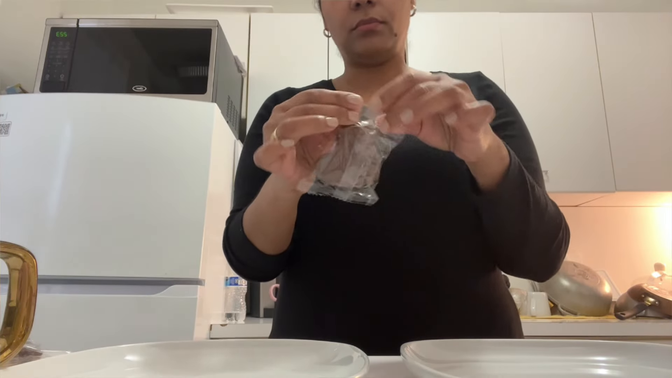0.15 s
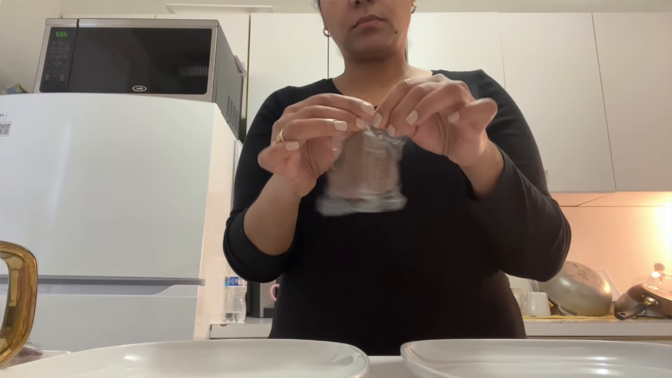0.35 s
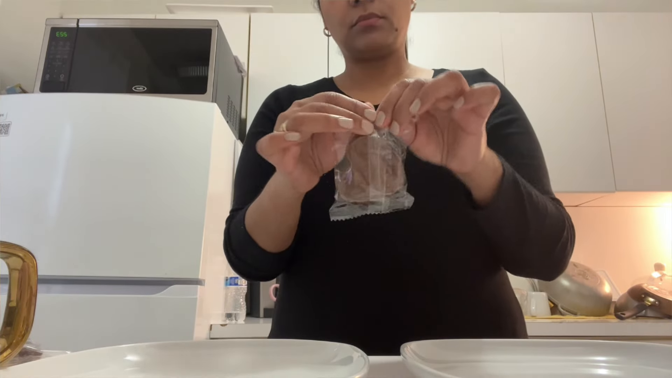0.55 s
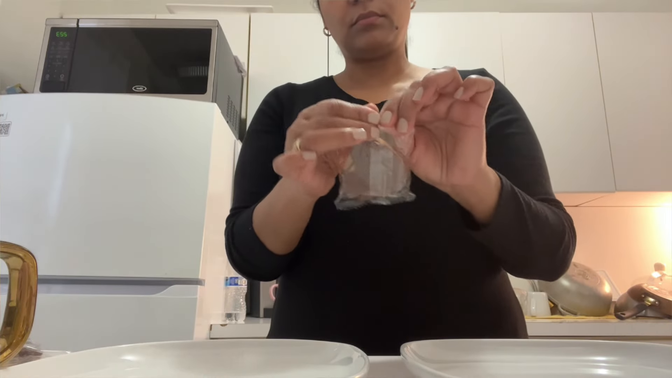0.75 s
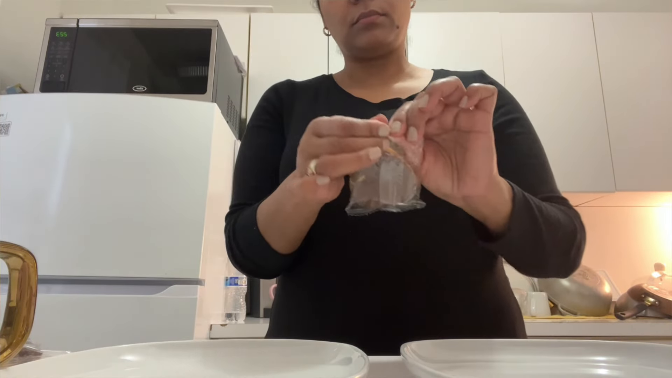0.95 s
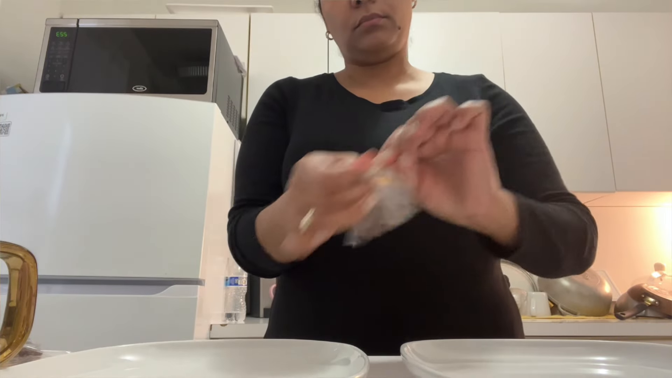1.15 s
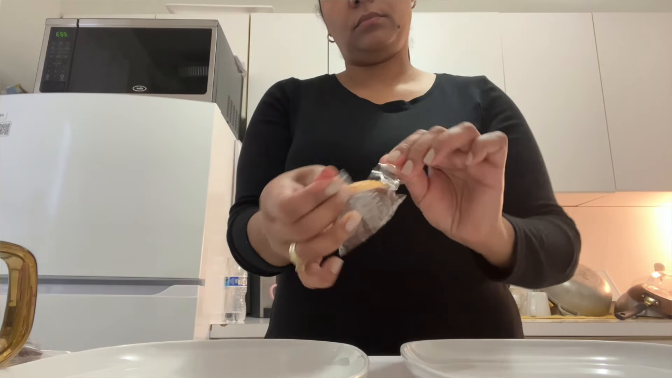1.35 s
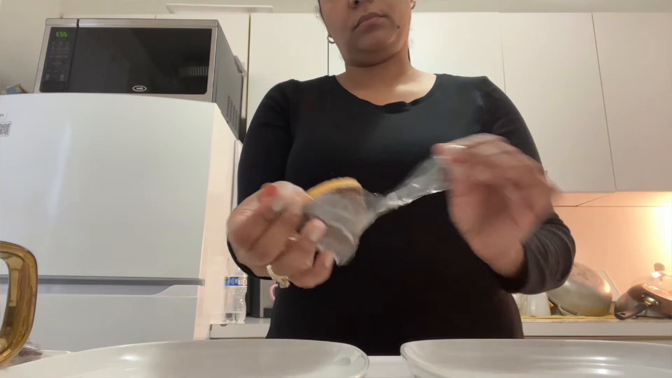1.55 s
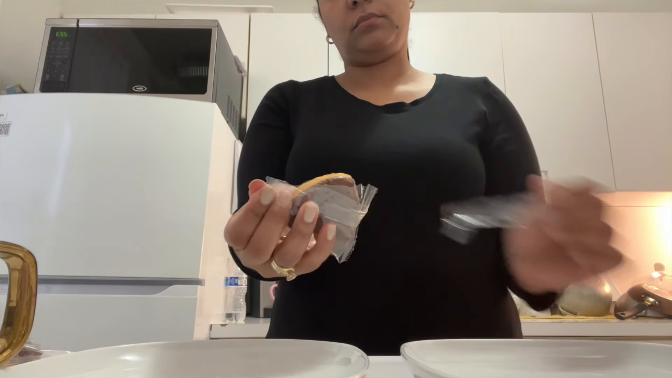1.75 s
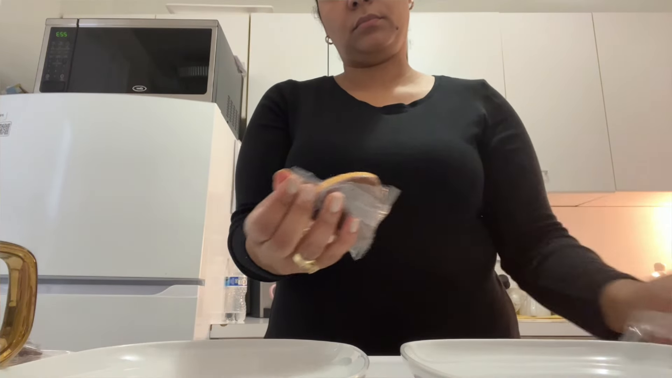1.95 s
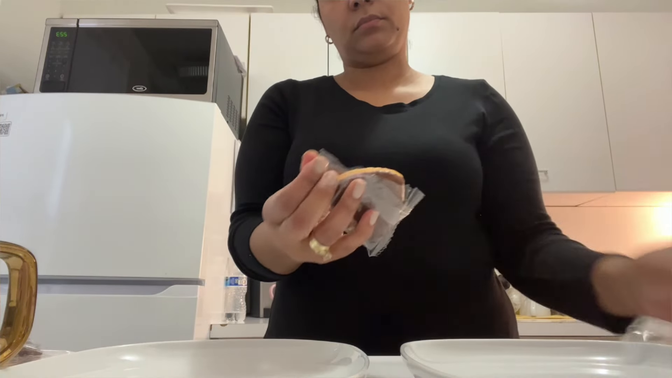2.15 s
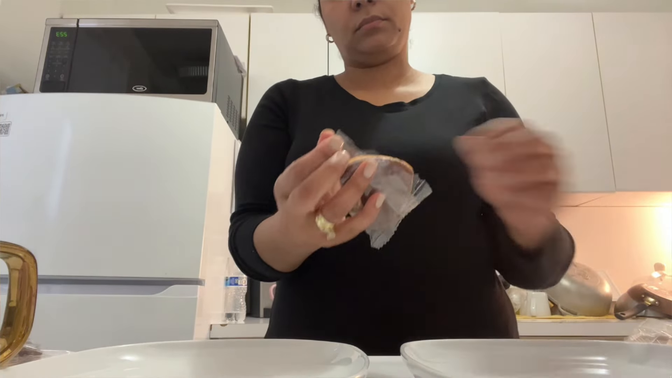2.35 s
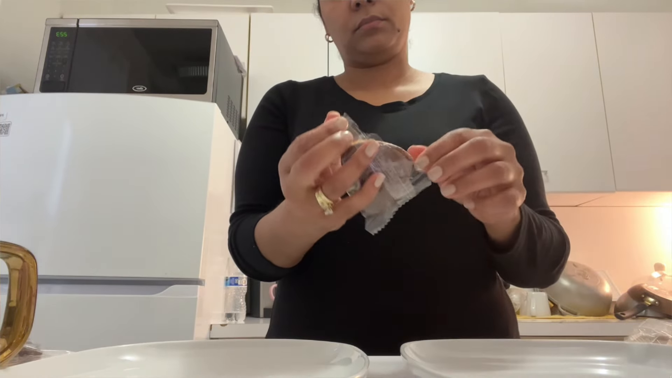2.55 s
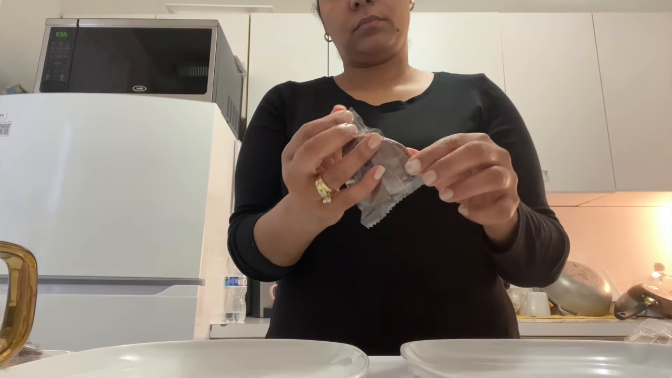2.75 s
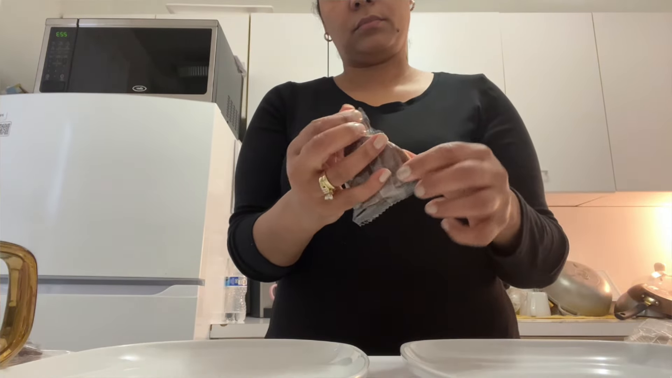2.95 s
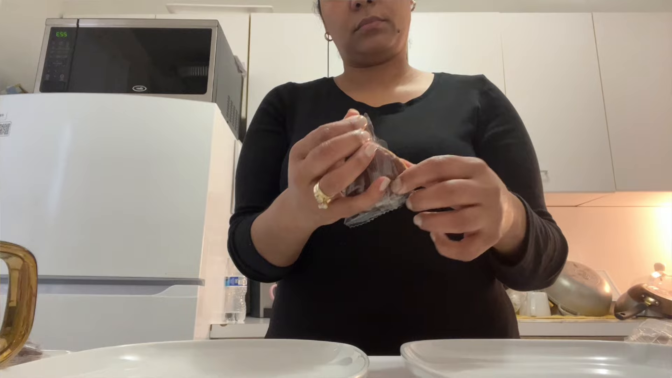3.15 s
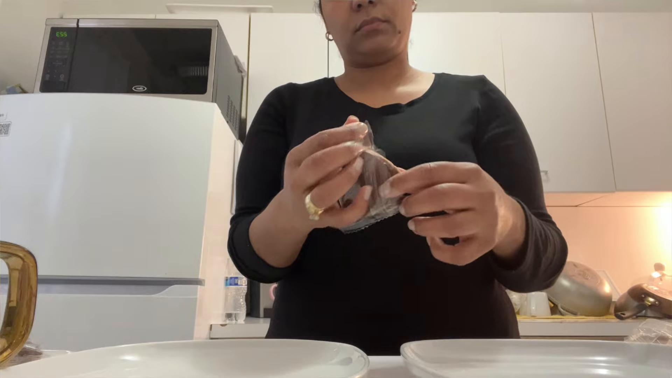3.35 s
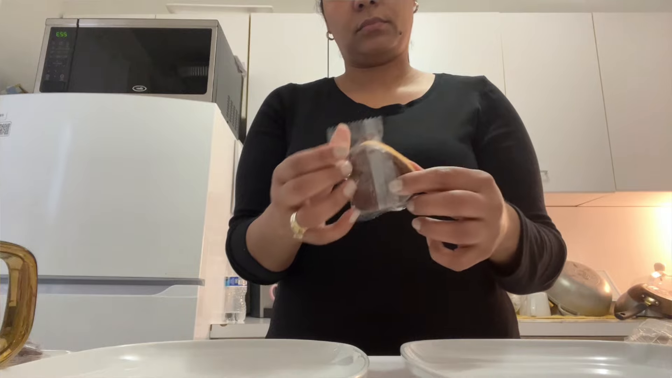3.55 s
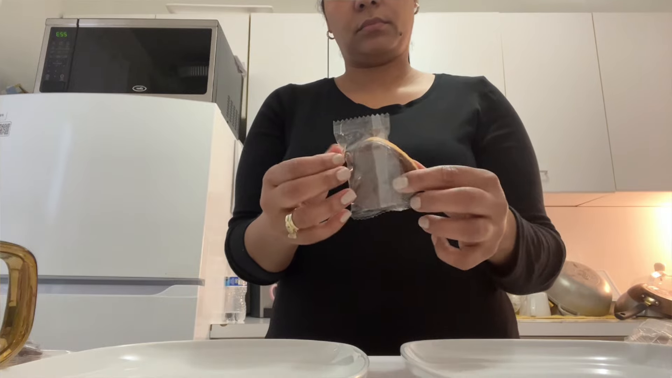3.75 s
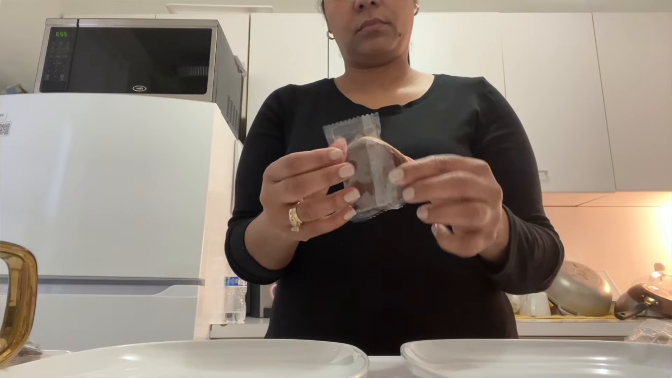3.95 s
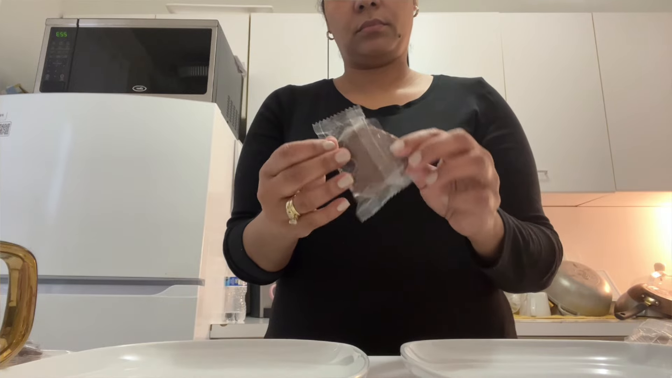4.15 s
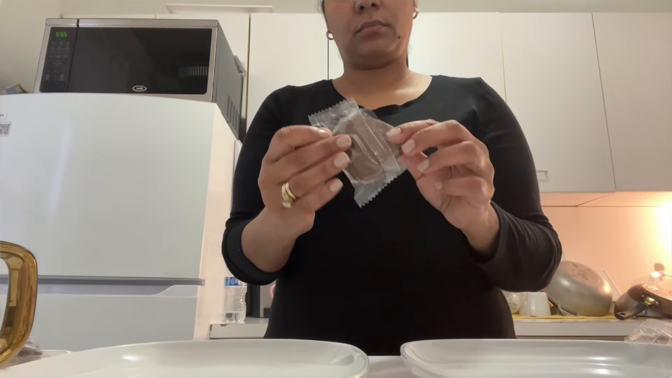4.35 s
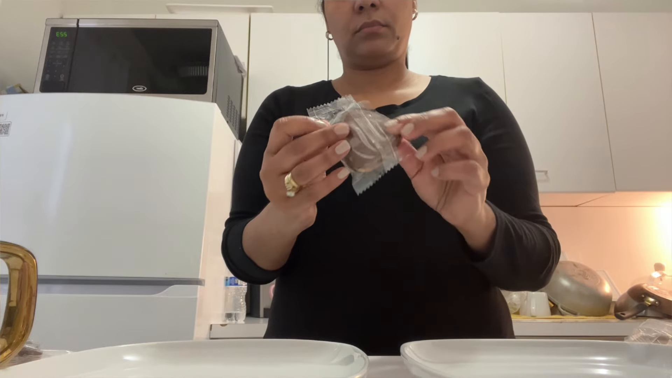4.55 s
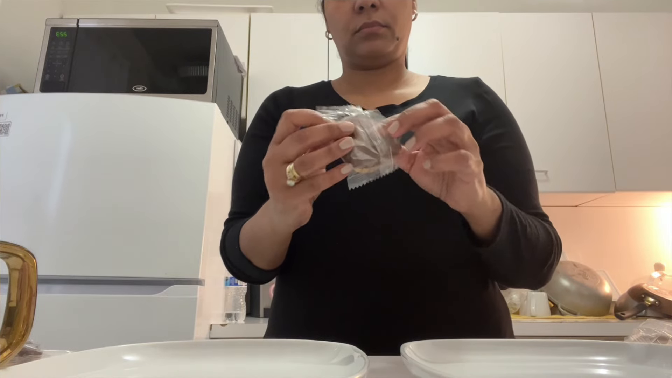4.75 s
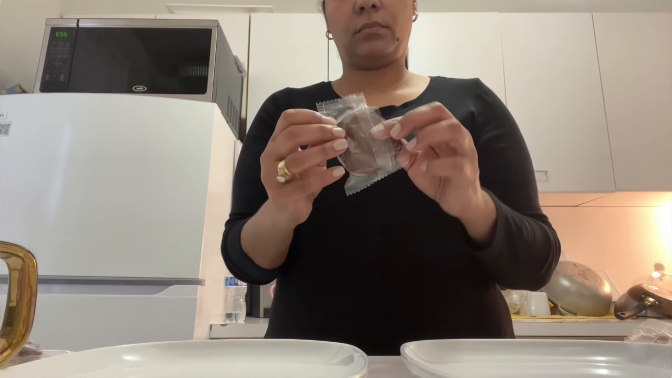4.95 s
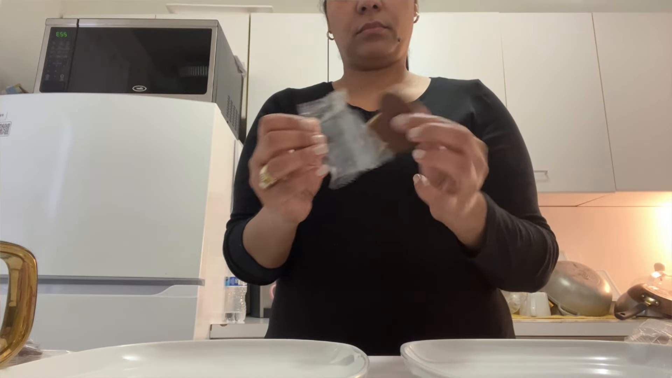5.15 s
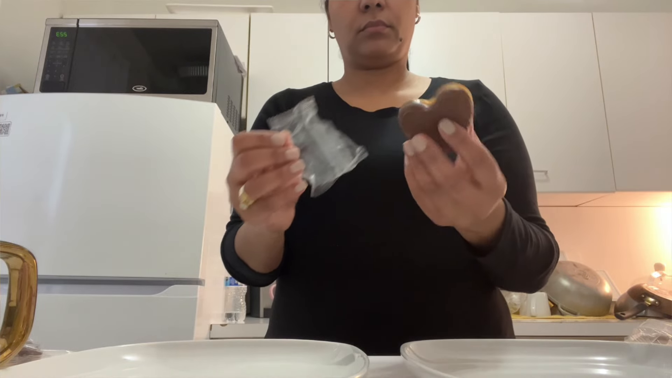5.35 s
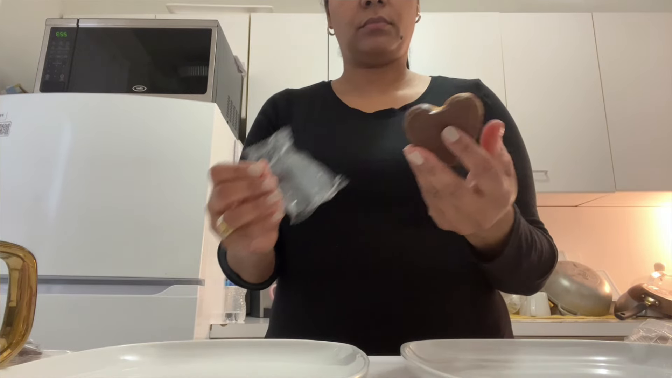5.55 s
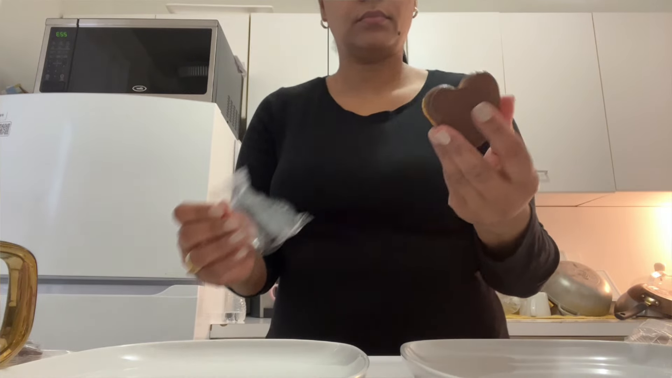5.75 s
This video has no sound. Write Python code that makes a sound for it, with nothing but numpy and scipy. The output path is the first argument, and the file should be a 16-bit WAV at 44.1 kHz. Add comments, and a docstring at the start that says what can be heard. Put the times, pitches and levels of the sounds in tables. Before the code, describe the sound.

A stiff plastic food wrapper crinkles, rips open and is picked at by hand in a quiet kitchen over a faint refrigerator hum.

```python
"""A stiff plastic biscuit wrapper at arm's length in a small kitchen: hands tear the top off and work the biscuit out.
Creases in the film buckle one by one as shaped noise bursts: loud snaps over a bed of tiny ones that thickens into rips.
Whole panels pop as decaying sines, a sleeve rubs as low noise, and one hard tick rings close by.
Cabinets and walls answer with short noise tails; a refrigerator hums as unsteady sines over steady air."""
import sys
import numpy as np
from scipy import signal
from scipy.fft import rfft, irfft, next_fast_len
from scipy.io import wavfile
from scipy.ndimage import map_coordinates

SR = 44100
rng = np.random.default_rng(int(sys.argv[2]) if len(sys.argv) > 2 else 0)


def inscribe(sig):
    """Save sig as 16-bit PCM at rate SR to the path in sys.argv[1].

    A 1-D sig is mono; a 2-D sig holds one channel per row.
    Samples are clipped to [-1, 1] before scaling.
    """
    pcm = np.round(np.clip(np.atleast_2d(sig).T, -1, 1) * 32767)
    wavfile.write(sys.argv[1], SR, pcm.astype(np.int16))


N = 255780  # length in samples
SHORT = 1024  # length of one crease, pop or tick in samples


def amp(db):
    """Decibels to gain."""
    return 10 ** (np.asarray(db) / 20)


def unit(x):
    """x at rms 1."""
    return x / np.sqrt(np.mean(x ** 2) + 1e-20)


def along(points, hz):
    """(Hz, value) points read on a log frequency axis."""
    f, v = np.transpose(points)
    return np.interp(np.log(hz + 1), np.log(f + 1), v)


def wobble(rate):
    """A smooth random curve with rate knots a second."""
    knots = rng.standard_normal(int(N * rate / SR) + 4)
    return map_coordinates(knots, [np.arange(N) * rate / SR])


def filtered(x, response):
    """x shaped by a response given as a function of frequency."""
    m = next_fast_len(N + SR // 2)
    return irfft(rfft(x, m) * response(np.fft.rfftfreq(m, 1 / SR)), m)[:N]


def causal(db):
    """The minimum-phase response with these levels, by folding the cepstrum."""
    cepstrum = irfft(np.log(amp(db)))
    half = len(cepstrum) // 2
    fold = np.r_[1, np.full(half - 1, 2), 1, np.zeros(half - 1)]
    return np.exp(rfft(cepstrum * fold))


def add(track, s, sound):
    """Mix a sound into the track at s seconds."""
    start = int(np.clip(round(s * SR), 0, N - 1))
    track[start:start + len(sound)] += sound[:N - start]


def refrigerator():
    """Compressor lines, slightly unsteady in level and phase, over the steady air of the kitchen."""
    # Each row: frequency in Hz, peak level in dB around which the line wobbles.
    hum_lines = [(59.5, -61.5), (119, -50), (273, -56), (495, -64.5), (1367, -70)]
    # Colour of the air. Each row: frequency in Hz, relative level in dB per Hz.
    air_colour = [(20, -16), (55, -7), (140, 3), (270, -5), (320, -13), (450, -12.5), (650, -17.5),
                  (1200, -19), (3000, -31.5), (4550, -30), (4780, -20.5), (5100, -28), (7000, -30.5),
                  (9000, -27), (12000, -41), (16000, -36)]
    t = np.arange(N) / SR
    hum = sum(amp(db + 1.9 * wobble(7.6)) * np.sin(2 * np.pi * hz * t + 0.83 * wobble(10.0))
              for hz, db in hum_lines)
    air = unit(filtered(rng.standard_normal(N), lambda hz: amp(along(air_colour, hz))))
    return hum + amp(-49.5) * air


def handling():
    """How hard the film is worked: squeezes swell and fade, rips catch, run and die; crackle and flexing in dB."""
    # The fingers squeeze the film and let go. Each row: tightest moment in seconds, crackle in dB before
    # the mix trims, build-up in seconds, let-go in seconds, flexing over crackle in dB before the trims.
    squeezes = [(0.128, -31.5, 0.21, 0.24, 2.5), (.335, -43, .015, .12, 5), (0.408, -37.5, 0.11, 0.11, 6),
                (0.721, -32.5, 0.31, 0.25, 0.5), (0.981, -44.5, .03, 0.13, 9), (1.87, -49.5, 0.14, .22, 8),
                (1.999, -39, 0.091, 0.19, 1.5), (2.7, -46.5, 0.19, 0.49, 2.5), (2.965, -46, 0.059, .12, 3),
                (3.09, -45.5, 0.28, 0.33, -5), (3.329, -39, 0.074, 0.084, -3), (3.509, -37, 0.085, 0.24, 1),
                (3.724, -46, .025, 0.1, 6), (4.033, -34.5, 0.062, 0.21, 2), (4.31, -55, 0.13, 0.096, 12),
                (4.5, -46, 0.032, 0.33, 1), (4.7, -40, 0.38, 0.6, 1.5), (5.015, -45, 0.082, 0.16, 7.5),
                (5.145, -35.5, 0.11, 0.15, 4.5), (5.228, -42.5, .03, 0.26, 9)]
    # The film rips, first across the seal, then along the strip. Each row: start in seconds,
    # end in seconds, crackle at the start and at the end in dB before the mix trims.
    rips = [(1.16, 1.217, -22, -20), (1.361, 1.668, -34, -27)]
    squeeze_range_db = 22  # crackle gained in a build-up and lost in a let-go
    attack_db_per_s, release_db_per_s = 900, 185  # how fast a rip catches and dies away
    rip_flex_db = -1.5  # flexing over crackle before the trims
    t = np.arange(N) / SR
    moves = []
    for s, db, build_s, let_go_s, flex_db in squeezes:
        away = np.maximum((s - t) / build_s, (t - s) / let_go_s)
        moves.append((db - squeeze_range_db * away, flex_db))
    for start, end, start_db, end_db in rips:
        catch_db = attack_db_per_s * np.maximum(start - t, 0)
        die_db = release_db_per_s * np.maximum(t - end, 0)
        moves.append((np.interp(t, [start, end], [start_db, end_db]) - catch_db - die_db, rip_flex_db))
    crackle_db = np.max([db for db, _ in moves], axis=0)
    return crackle_db, np.max([db + flex_db for db, flex_db in moves], axis=0)


def crease(boom_db, fizz_db, life_s, kick, ripple_db, flex, rise_s=0.00012, after_db=-17, after_t60=0.019):
    """One crease buckles: a kick and a shudder of the film, towards the listener and into the room, each at energy 1."""
    # Broad flexing resonances of the wrapper. Each row: centre in Hz, width in Hz,
    # rise over the film's colour in dB before scaling by flex.
    resonances = [(520, 186, 7.5), (986, 382, 13.5), (2180, 643, 14.5), (3260, 420, 6), (8200, 350, 5.5)]
    # Colour of the film. Each row: frequency in Hz, relative level in dB per Hz.
    film_colour = [(100, -24), (280, -19), (400, -1), (700, -9.5), (1500, -2.5), (2800, -3.5), (4500, -1.5),
                   (6700, 5), (9000, 2.5), (10500, -4), (12200, -20.5), (14500, -7), (16000, -15.5)]
    hz, t = np.fft.rfftfreq(SHORT, 1 / SR), np.arange(SHORT) / SR
    # the buckle runs along the crease and stops; the film trembles briefly after it
    run_s = life_s * np.exp(0.66 * rng.standard_normal())
    run = np.exp(-(t / run_s) ** 2)
    tremble = amp(after_db - 60 * t / after_t60)
    envelope = (run + tremble) * (1 - np.exp(-t / rise_s))
    shudder = rng.standard_normal(SHORT) * envelope
    shudder[int(rise_s * SR)] += kick
    peaks = sum(db * np.exp(-2 * ((hz - f) / width) ** 2) for f, width, db in resonances)
    colour = along(film_colour, hz) + flex * peaks
    # a large facet moves the whole sheet, a small one only fizzes
    facet = along([(2500, boom_db), (4200, 0), (9500, 0), (12500, fizz_db)], hz)
    knots = rng.standard_normal(size=40)
    ripple = ripple_db * np.interp(np.sqrt(hz / hz[-1]), np.linspace(0, 1, 40), knots)
    direct = irfft(rfft(shudder) * causal(colour + facet + ripple))
    # the room receives the crease from all sides, so its colour evens out
    radiated = irfft(causal(0.43 * colour + 0.6 * facet + .5 * ripple))
    return np.array([direct / np.linalg.norm(direct), radiated / np.linalg.norm(radiated)])


def crinkle(count=56, spread_db=7.0, largest_db=14, split_hz=3000):
    """Countless small creases; the harder the film is worked, the faster they come."""
    crackle_db, flex_db = handling()
    rate = np.clip(340 * amp(.8 * (crackle_db + 43.5)), 60, 4000)  # creases a second
    bed = np.zeros(N)
    for _ in range(count):
        fires = rng.random(N) < rate / (SR * count)
        sizes = amp(np.minimum(spread_db * rng.exponential(size=N), largest_db))
        facet = crease(rng.normal(0, 5.9), rng.normal(0, 14.0), life_s=0.0039, kick=1.87,
                       ripple_db=3.5, flex=0.69)[0]
        # dividing by the root of the rate leaves the level to the handling curves
        bed += signal.oaconvolve(fires * sizes / np.sqrt(rate), facet)[:N]
    # flexing of the sheet lies below the split, crackle above it
    flexing = filtered(bed, lambda hz: 1 / (1 + (hz / split_hz) ** 8))
    return amp(flex_db - 8.0) * unit(flexing) + amp(crackle_db - 4.0) * unit(bed - flexing)


def stray_snaps(per_s=30, over_db=3, ceiling_db=-29.5):
    """Middling creases give way by chance, louder as the film is worked harder; rows as for the loud snaps."""
    crackle_db = handling()[0]
    rows = []
    draws = rng.standard_normal((int(per_s * N / SR), 4))
    for slot, (luck, size, boom, fizz) in enumerate(draws):
        s = (slot + luck % 1) / per_s
        worked_db = crackle_db[min(int(s * SR), N - 1)]
        db = min(worked_db + over_db + 4.0 * size, ceiling_db)
        rows.append((s, db, 7 * boom, 6 * fizz))
    return rows


def snaps():
    """The loud and middling creases, each buckling at its own moment: direct and radiated sound."""
    # The loudest creases, heard one by one. Each row: start in seconds, level in dB before a 24 dB lift,
    # boom of the sheet in dB, fizz in dB.
    loud_creases = [(.0296, -30, 6, 12), (.0433, -33, 17, -9), (0.0864, -32, -6, 15), (0.1229, -24, 6, 5),
                    (.201, -28, -11.5, 10), (0.3248, -34.5, 2, 7), (0.3825, -33.5, 7, 12),
                    (.4105, -29, -15, 13), (0.4299, -38, 27, -5), (0.553, -36.5, 2, 16),
                    (0.5985, -22.5, 4.5, 9), (.625, -30, -26, 9), (0.682, -26.5, -0.5, 13),
                    (0.7167, -24.5, -6, 7), (.73, -28.5, 13, 18), (0.769, -29, -3, 9), (0.7857, -31, -5, 7),
                    (0.8326, -28, 2, 5), (0.865, -33.5, -16, 11), (0.958, -25, -6.5, 5),
                    (0.9641, -25.5, 5, 8), (1.067, -35.5, 6.5, -9.5), (1.0795, -32, 39, -14),
                    (1.136, -28.5, 23, -6), (1.171, -18.5, -7, 19.5), (1.1791, -19, 5, -11),
                    (1.2083, -16.5, 0, -2), (1.2837, -24, -29, 2), (1.3648, -31, -6, -18),
                    (1.3935, -28, 15, -2), (1.422, -23.5, 0, 12), (1.5132, -24, -2, 3),
                    (1.5294, -28.5, 0, -2), (1.5434, -19.5, -2, -9), (1.559, -18, -1.5, -14),
                    (1.607, -21.5, -10, 4), (1.6198, -15, -6, 3), (1.6482, -17.5, -13, 8),
                    (1.6843, -25, 18, -4), (1.7192, -22, -2.5, 8), (1.8056, -37, -6, -5),
                    (1.953, -36.5, -4, 0), (1.967, -38, -6, -10), (1.986, -31, -19, 6),
                    (2.2402, -41, -7.5, 10), (2.4, -49.5, -19, -13), (2.5343, -38, -14.5, 7),
                    (2.6067, -38, 5, -14), (2.6954, -27.5, 8.5, 7), (2.814, -38, -1, -9),
                    (2.9473, -40.5, 11.5, -14), (3.0252, -35, -12.5, -2), (3.067, -36, -4, 0),
                    (3.0897, -32, -1, -8), (3.2835, -40.5, -1, 5), (3.3221, -33.5, -7, 7),
                    (3.3354, -33.5, 3, -2), (3.4904, -36.5, 2, 11), (3.5946, -29, -10, 6),
                    (3.616, -34.5, -4, 17), (3.9408, -32.5, -9, 6.5), (4.032, -25, -9, -3),
                    (4.088, -31.5, -11, 21), (4.1445, -32.5, 1, -3), (4.1821, -39, 20, -11),
                    (4.2322, -35.5, 1, -4), (4.302, -36, 3.5, -16), (4.4799, -29, -8.5, 2.5),
                    (4.535, -35, -5, -5), (4.6346, -29, -0.5, 8), (4.6915, -29.5, -13, 10),
                    (4.752, -34.5, -5, 4), (4.779, -31.5, -11, 5), (4.903, -28, -9.5, 8),
                    (5.0003, -33.5, -1, 9), (5.062, -32.5, 1.5, -4), (5.1321, -23, -5.5, 0),
                    (5.2209, -21.5, 5, -15), (5.3542, -40, -25, 3), (5.391, -36.5, -6, -1),
                    (5.5328, -48.5, 2, -3)]
    direct, radiated = np.zeros(N), np.zeros(N)
    for s, db, boom_db, fizz_db in loud_creases + stray_snaps():
        # life_s is the typical run of a buckle in seconds
        pair = crease(boom_db, fizz_db, life_s=.0027, kick=1.2, ripple_db=2.5, flex=1.234)
        front, around = amp(db + 24.0) * pair
        add(direct, s, front)
        add(radiated, s, around)
    return direct, radiated


def kitchen(x, gap_s=.004):
    """Cabinets and walls answer with a short tail of decaying noise, new for each stretch of sound."""
    # Each row: frequency in Hz, time to fall 60 dB in seconds.
    decay = [(300, 0.19), (2200, 0.2), (7000, 0.22), (15000, 0.048)]
    wet = np.zeros(N)
    for part in np.array_split(np.arange(N), 16):
        hz, t, z = signal.stft(rng.standard_normal(SR // 2), SR, nperseg=256)
        fading = z * amp(-60 * t / along(decay, hz)[:, None])
        tail = signal.istft(fading, SR, nperseg=256)[1]
        add(wet, part[0] / SR + gap_s, signal.fftconvolve(x[part], tail / np.linalg.norm(tail)))
    return wet


def pops(t60=0.015, rise_s=0.00009):
    """Whole panels of the wrapper flip over, each ringing briefly at its own pitch."""
    # Each row: start in seconds, peak level in dB, pitch in Hz.
    flips = [(.4105, -22.5, 1100), (.769, -22.5, 3280), (1.648, -21, 507), (1.72, -24, 2000),
             (2.6963, -23, 2310), (2.6969, -23.5, 924), (5.2226, -20, 3390)]
    t, track = np.arange(SHORT) / SR, np.zeros(N)
    for s, db, hz in flips:
        ring = np.sin(2 * np.pi * hz * t) * amp(-60 * t / t60) * (1 - np.exp(-t / rise_s))
        add(track, s, amp(db) * ring / np.abs(ring).max())
    return track


def sleeve():
    """Soft cloth rubbing: noise shaped into a low, uneven rustle."""
    # The arm swings away and the sleeve rubs. Each row: time in seconds, level in dB around which it wobbles.
    rub = [(1.3, -77), (1.65, -36), (1.76, -55), (2.1, -53), (2.55, -62.5)]
    # Colour of rubbing cloth. Each row: frequency in Hz, relative level in dB per Hz.
    cloth_colour = [(25, -14), (60, -2), (190, 1), (310, 0.5), (440, 7), (800, -8), (2500, -60)]
    cloth = filtered(rng.standard_normal(N), lambda hz: amp(along(cloth_colour, hz)))
    times, levels = np.transpose(rub)
    level_db = np.interp(np.arange(N) / SR, times, levels)
    return amp(level_db + 4.0 * wobble(29.9)) * unit(cloth)


def tick(echo_s=.0087, echo_db=-15):
    """A hard, very short tick of decaying modes and its bounce off a near surface."""
    # Each row: start in seconds, peak level in dB.
    hits = [(2.1168, -2)]
    # What the tick rings with. Each row: frequency in Hz, relative level in dB, time to fall 60 dB in seconds.
    modes = [(6070, 22, 0.001), (4900, -5, 0.0062), (3770, -1, 0.0044), (2210, -13, 0.024)]
    t, track = np.arange(SHORT) / SR, np.zeros(N)
    ring = sum(amp(db - 60 * t / t60) * np.sin(2 * np.pi * hz * t) for hz, db, t60 in modes)
    ring *= 1 - np.exp(-t / .00008)  # soften the onset
    ring /= np.abs(ring).max()
    for s, db in hits:
        add(track, s, amp(db) * ring)
        add(track, s + echo_s, amp(db + echo_db) * ring)
    return track


def scene():
    """The wrapper at arm's length, the tick nearer with less room on it, the refrigerator behind."""
    loud, radiated = snaps()
    small, panels, near = crinkle(), pops(), tick()
    into_room = amp(-8.0) * radiated + amp(-5.0) * small + amp(-9.5) * panels + amp(-16.0) * near
    room = kitchen(into_room)
    return (loud + small + panels + near + room + sleeve() + refrigerator())[None]


def record(dry, top_hz=16100):
    """The recorder cuts very steeply above its band limit."""
    return filtered(dry[0], lambda hz: 1 / (1 + (hz / top_hz) ** 120))[None]


dry = scene()
out = record(dry)
inscribe(out)
```